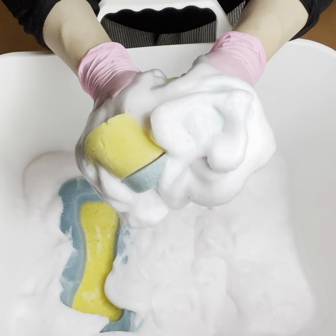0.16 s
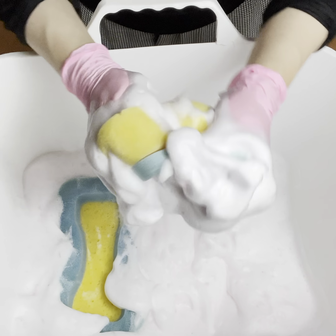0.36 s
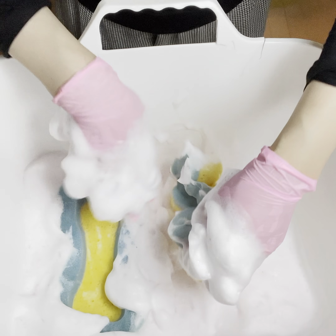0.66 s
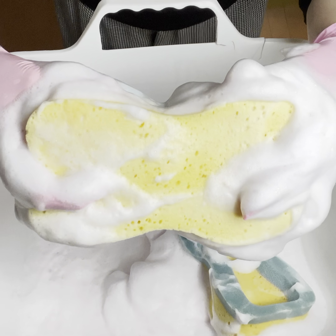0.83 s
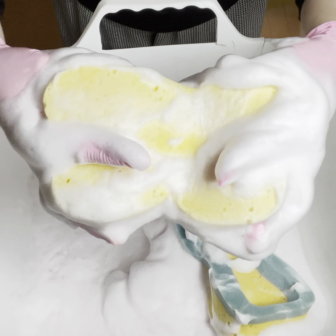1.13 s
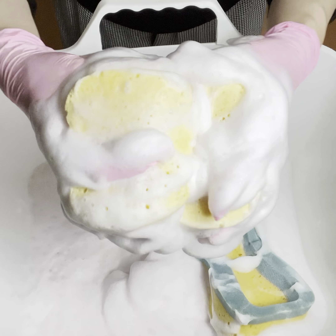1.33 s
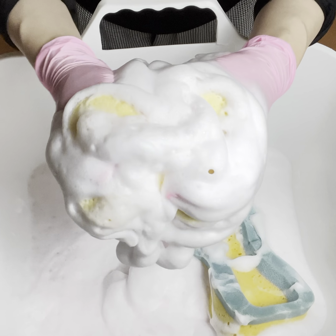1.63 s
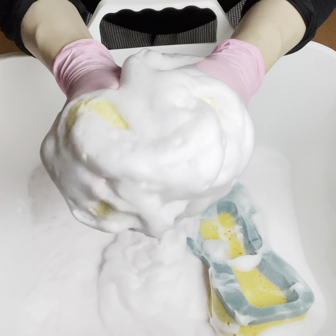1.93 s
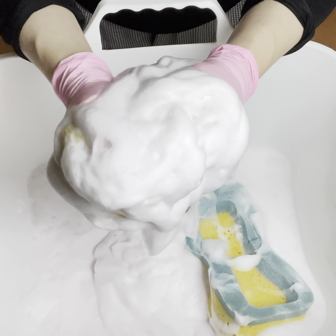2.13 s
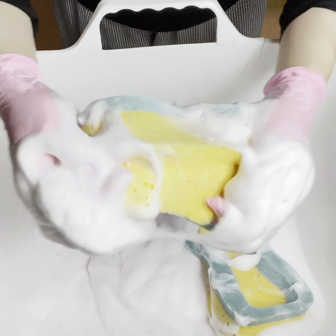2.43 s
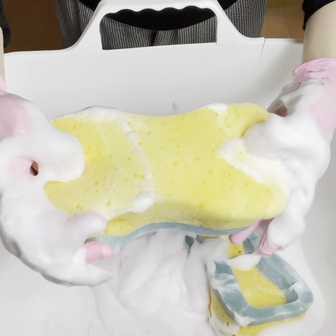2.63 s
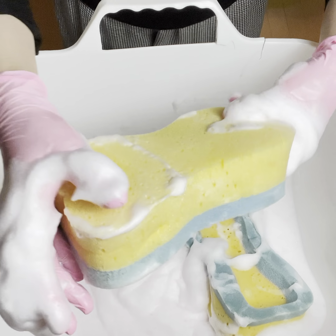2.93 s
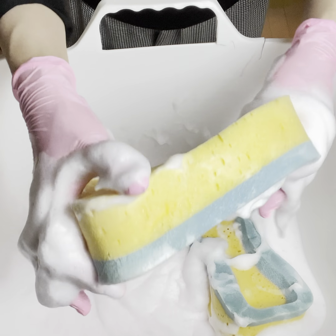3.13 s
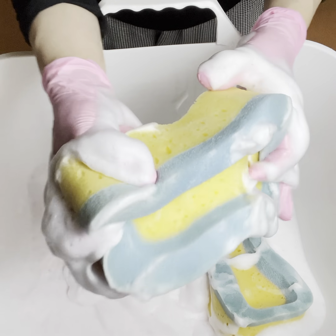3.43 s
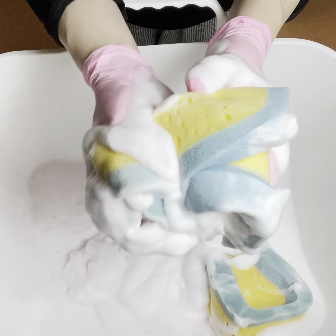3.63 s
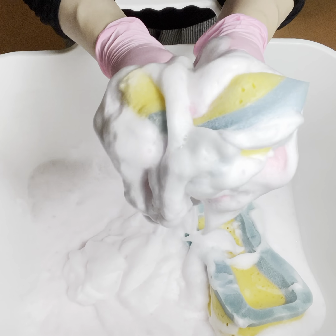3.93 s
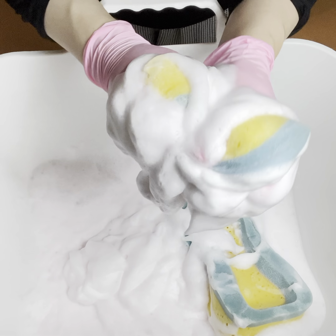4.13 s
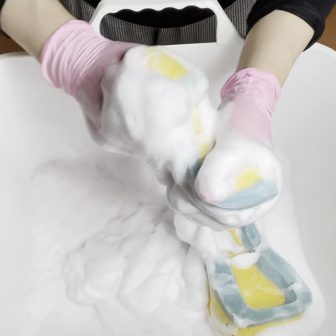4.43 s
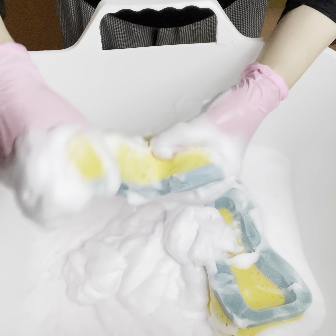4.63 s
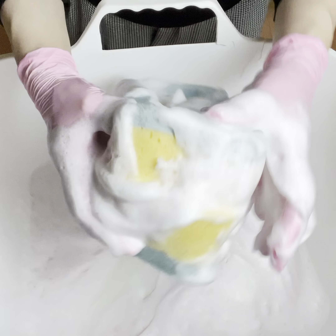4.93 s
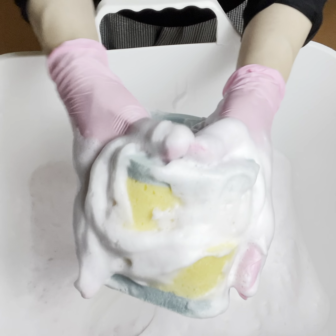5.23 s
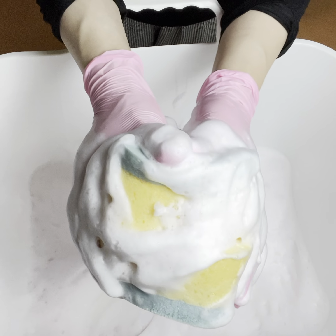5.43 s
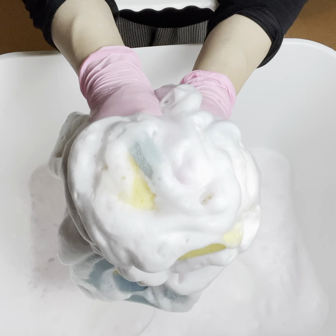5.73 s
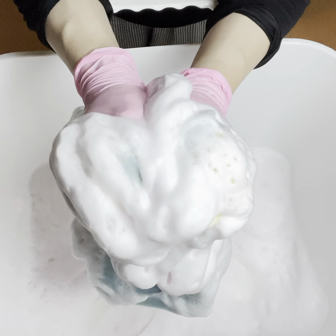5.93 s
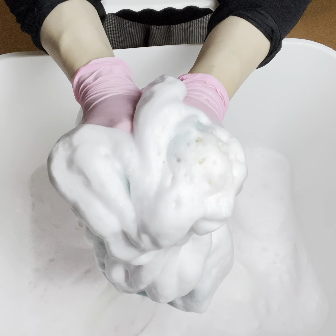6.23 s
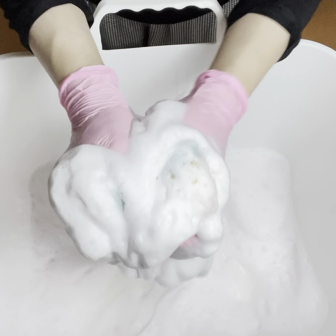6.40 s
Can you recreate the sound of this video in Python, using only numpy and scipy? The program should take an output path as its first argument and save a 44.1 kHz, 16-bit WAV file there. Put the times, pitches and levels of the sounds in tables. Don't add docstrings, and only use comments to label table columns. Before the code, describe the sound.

Gloved hands knead a soapy sponge in bursts of bubbly squishing and fine crackling fizz, with quieter lulls, then one loud slick snap.

```python
import sys
import numpy as np
from scipy import signal
from scipy.fft import rfft, irfft, next_fast_len
from scipy.io import wavfile
from scipy.ndimage import uniform_filter1d

SR = 44100
rng = np.random.default_rng(int(sys.argv[2]) if len(sys.argv) > 2 else 0)


def rack_gain(trim_db):
    fader = np.asarray(trim_db, float)
    return 10 ** (fader / 20)


def master_out(mix):
    frames = np.transpose(np.atleast_2d(mix))
    ceiling = np.clip(frames, -1, 1)
    pcm = np.round(ceiling * 32767).astype(np.int16)
    wavfile.write(sys.argv[1], SR, pcm)


N = 289296
T = np.arange(N) / SR

# [f/Hz, level/dB]
ROOM_TONE = [(21, -33), (35, 2), (152, 3), (321, -1.5), (541, -5.5), (676, -16.5), (1040, -4), (1530, -9),
             (2070, -14), (2580, -17), (3000, -55), (3900, -50), (6600, -120)]
# [f/Hz, level/dB]
RUMBLE_TONE = [(25, -25), (38, -5), (52, 10), (68, 14), (95, -26), (200, -52)]
# [t/s, change/dB, rise/s, fall/s]
KNOCKS = [
    (.15, 11, 0.28, 0.42),
    (1.17, 7, 0.27, .3),
    (1.7, -4, .2, .12),
    (2.3, -5, 0.36, .3),
    (2.67, 7, .1, .15),
    (3.05, 4, 0.14, 0.11),
    (3.85, 2, 0.22, .25),
    (4.84, 2, .1, 0.13),
    (5.5, 1, 0.33, 0.44),
]
MACHINE_HZ = [117.5, 145.1]
# [t/s], and its [level/dB]
LOW_MACHINE_S = (2.25, 2.38, 2.9, 3.05, 3.2)
LOW_MACHINE_DB = (-66, -42.5, -40, -41, -57)
# [t/s, change/dB, rise/s, fall/s]
HIGH_MACHINE_SWELLS = [
    (3.76, 12.5, 0.16, 0.16),
    (5.8, 4, 0.34, 0.33),
]
# [t/s, pressure/dB, narrowing of the pores/dB]
SQUEEZES = [(0, -32, -7), (.74, -46, -5), (.755, -49.5, -8), (1.22, -42.5, -10), (1.45, -35.5, -5.5),
            (1.8, -34, -6.5), (2.0, -37, -11), (2.62, -43, -1.5), (2.74, -52.5, 1), (3.42, -45.5, -2.5),
            (3.7, -33.5, -0.5), (4.08, -35.5, -4), (4.3, -42.5, -6), (4.95, -46, -6.5), (5.38, -44, -5.5),
            (5.55, -30, -7), (6.02, -33.5, -4), (6.28, -52.5, -5)]
# [t/s, change/dB, rise/s, fall/s]
KNEADS = [(.1, -6, 0.17, 0.094), (.2, 2, 0.028, .008), (.228, 6, 0.012, 0.0055), (.26, 2, .02, 0.07),
          (.775, -8, .02, .006), (2.055, -7, 0.035, .006), (2.083, -2, .012, .004), (4.04, 1.5, .06, 0.071),
          (4.11, -1, 0.018, .03), (5.428, -4, 0.026, .005), (.44, 3.5, 0.046, 0.059),
          (1.81, 7.5, 0.07, 0.029), (1.88, -2.5, 0.049, .04), (2.09, -0.5, 0.028, .05),
          (2.16, -3, 0.044, 0.034), (2.28, 3, 0.097, 0.11), (2.82, 5, 0.077, 0.022),
          (3.85, -3.5, 0.33, 0.064), (4.36, 6.5, 0.05, 0.017), (4.75, 3, 0.12, 0.065),
          (4.95, -11, 0.077, 0.033), (5.9, -1, 0.076, 0.053), (6.39, 17.5, 0.092, 0.15),
          (6.49, 13.5, 0.096, 0.14)]
# [f/Hz, level/dB]
GURGLE_TONE = [(250, -15.5), (420, -1), (600, -3), (800, -4), (1100, -0.5), (1400, 1), (2000, -8.5),
               (2800, -13.5), (4000, -32.5)]
# [t/s, f/Hz, lift/dB]
CAVITY = [(0, 715, 0), (.22, 1000, 1), (.7, 810, 2), (1.3, 1020, -2), (1.5, 640, 0.5), (1.8, 940, 0),
          (1.93, 570, 0.5), (2.3, 1000, 0), (2.7, 620, 1), (3.68, 635, -4), (3.88, 970, 0.5),
          (4.07, 860, 5), (4.57, 910, 0), (5.5, 610, -1), (5.7, 1150, -5), (5.82, 930, -10),
          (6.03, 566, -1.5), (6.45, 700, 3)]
# [t/s, change/dB, rise/s, fall/s]
RUBS = [
    (.73, 26, .45, .012),
    (2.27, 18, .03, .06),
    (2.6, -4, 0.22, .05),
    (3.63, -1, 0.033, .1),
    (3.86, 16, .1, .05),
    (4.07, 5, 0.067, .04),
    (5.65, -1, 0.13, 0.088),
    (5.83, 15, 0.075, .1),
]
# [f/Hz, level/dB]
SLOSH_TONE = [(50, -16), (100, -3.5), (150, -5.5), (200, -0.5), (320, -8.5), (500, -38)]
# [t/s, change/dB, rise/s, fall/s]
SLOPS = [(.6, 6, .3, 0.43), (.82, -16, 0.054, 0.079), (1.35, 0, .2, 0.22), (1.9, -16, 0.056, 0.23),
         (2.45, -7, 0.13, 0.041), (2.86, -14, 0.11, 0.12), (3.72, 0.5, 0.14, 0.095),
         (4.4, -4.5, 0.12, 0.093), (5.3, 3.5, 0.17, 0.53), (4.94, -23, 0.038, 0.05),
         (5.83, 6.5, 0.12, 0.12), (6.4, 17, 0.073, 0.3)]
# [t/s, fizz/dB, brightness/dB re fizz, coarse bubbles/dB re fizz]
FIZZ = [(0, -40, -10, -5.5), (.22, -51.5, -13, 7), (.5, -43, -12.5, 2), (.76, -53.5, -6.5, 4),
        (.95, -56, -17, -7), (1.45, -33.5, -8.5, -0.5), (1.7, -43, -18, -1.5), (2.2, -52, -4.5, 4),
        (2.5, -42.5, -11.5, -1.5), (3.08, -57, -14, -3), (3.5, -42, -12, -1), (4, -41, -10, 1.5),
        (4.2, -45, -7.5, -2), (4.85, -46.5, -9.5, -0.5), (5.15, -62, -7, 2), (5.6, -37, -12, -0.5),
        (5.9, -45.5, -12.5, 1), (6.33, -64.5, -9, 1)]
# [t/s, change/dB, rise/s, fall/s]
GUSHES = [(.28, 4.5, 0.015, 0.034), (.84, -18, 0.045, 0.063), (1.19, -5, 0.054, 0.1), (.7, 4, 0.13, .04),
          (1.81, 1.5, 0.11, 0.036), (1.9, -3.5, 0.13, .04), (1.99, 0, 0.032, 0.042),
          (2.06, -6.5, 0.062, 0.022), (2.23, -10.5, 0.083, 0.038), (2.27, 13, 0.022, 0.026),
          (2.36, 4, 0.068, 0.15), (2.48, 5, 0.0069, 0.079), (2.63, 6.5, 0.1, 0.029),
          (2.73, -2.5, 0.095, 0.055), (2.81, 5.5, 0.041, 0.043), (2.92, -5, 0.076, 0.066),
          (3.33, -5, .07, .06), (3.62, -3, 0.068, 0.034), (4.12, 2.5, 0.0091, 0.15),
          (4.38, 1.5, 0.04, 0.038), (4.52, -3, 0.16, 0.047), (4.58, 8.5, 0.018, 0.036),
          (4.67, 6, 0.055, 0.046), (4.97, -3, 0.025, 0.058), (5.15, 11.5, 0.045, 0.063),
          (5.8, 5, 0.11, 0.1), (6.03, 4, 0.092, 0.088), (6.2, 2.5, .03, 0.18), (6.424, 23.5, 0.091, .5),
          (6.5, -1, 0.056, .5)]
# [f/Hz, level/dB]
FIZZ_TONE = [(700, -3.5), (1500, 0), (2200, 3.5), (3000, 0.5), (4500, -0.5), (7000, -2.5), (8500, -1.5),
             (10500, -8), (12500, -8.5), (15500, -9)]
# [f/Hz, width/Hz, level/dB re direct sound]
TUB_MODES = [(548, 40, -4), (604, 32, -1), (740, 34, -1), (820, 45, -4), (970, 50, -4), (1060, 70, -5),
             (1326, 50, -1), (2000, 50, -2), (2620, 100, -4), (3790, 70, -3), (4117, 60, -6),
             (4705, 60, -7), (5450, 80, -7), (6154, 70, -5)]
# [t/s, peak/dB, f/Hz, length/s]
POCKETS = [(0.2033, -9, 1040, 0.0045), (0.236, -13.5, 1030, 0.0036), (0.253, -20, 1090, 0.006),
           (0.409, -18, 780, 0.0038), (0.473, -38, 1030, 0.0099), (0.778, -30, 740, 0.0061),
           (0.805, -29, 1050, 0.0024), (1.749, -20.5, 750, 0.0059), (1.786, -19, 1070, 0.0047),
           (1.796, -29, 980, 0.015), (1.919, -22.5, 288, 0.0093), (1.939, -28.5, 660, 0.026),
           (1.978, -36, 540, 0.0088), (2.06, -23.5, 523, 0.013), (2.084, -20.5, 1120, 0.01),
           (2.28, -27, 550, 0.012), (3.678, -21, 570, 0.007), (3.711, -18, 1250, 0.0032),
           (3.885, -21.5, 1040, 0.0071), (3.973, -24, 776, 0.005), (4.132, -25, 830, 0.0067),
           (4.34, -27.5, 590, 0.0026), (4.565, -22, 860, 0.0054), (4.572, -14.5, 867, 0.0031),
           (4.579, -17.5, 690, 0.0048), (5.433, -28, 730, 0.0058), (5.486, -21.5, 606, 0.0039),
           (5.552, -17, 700, 0.0072), (5.798, -15, 880, 0.0034), (6.024, -18.5, 536, 0.0072),
           (0.23, -16.5, 1900, 0.0029), (0.18, -26, 2820, .0015), (2.108, -28, 1050, 0.015),
         (1.797, -22.5, 596, 0.013), (3.776, -24, 200, 0.0091), (3.747, -23, 190, .01),
         (3.7, -11, 1000, 0.0042), (.205, -15, 540, 0.0034), (.235, -19, 560, 0.0034),
         (2.06, -22, 1240, 0.0072), (2.089, -25.5, 520, 0.015), (2.641, -34, 336, 0.033),
         (3.642, -24, 160, 0.024), (4.81, -27, 209, 0.014), (5.557, -18, 220, .008),
         (.074, -30, 760, 0.0059), (5.566, -20, 630, 0.01), (3.737, -25, 760, 0.0078),
           (0.18, -21, 1060, 0.004), (0.265, -31, 980, 0.0036), (1.595, -21.5, 810, 0.0034),
            (1.66, -26, 533, 0.0045), (1.694, -26, 790, 0.004), (1.776, -23, 982, 0.0031),
            (3.604, -24, 810, 0.0047), (3.664, -22.5, 533, 0.0043), (3.714, -19, 1070, 0.0032),
            (3.748, -27, 697, 0.0033), (3.768, -29, 732, 0.0046), (3.791, -15, 1350, 0.0048),
            (3.81, -27, 589, 0.004), (3.898, -19, 1070, 0.0036), (4.004, -21, 775, 0.004),
            (4.03, -20, 1000, 0.0033), (4.059, -23, 890, 0.0057), (4.082, -25, 958, 0.0047),
            (5.579, -20, 820, 0.0036), (5.711, -20, 1360, 0.004), (5.73, -28, 619, 0.0031),
            (5.757, -23, 603, 0.0053), (5.913, -21, 821, 0.005), (5.925, -23, 571, 0.004),
            (5.942, -19.5, 600, 0.004), (5.98, -18, 746, 0.0021), (6.01, -24, 560, 0.0031),
            (6.042, -23, 587, 0.0036)]
# [t/s, peak/dB, t60/s]
SPITS = [(0.2019, -43, 0.02), (0.2723, -32, 0.022), (0.8703, -35, 0.0089), (0.9113, -34, 0.018),
         (0.9208, -35, 0.018), (1.062, -46, 0.018), (1.3428, -35, 0.016), (1.916, -27, 0.02),
         (1.9794, -33, 0.018), (2.0784, -29, 0.028), (2.2597, -26, 0.031), (2.4818, -28, 0.023),
         (4.575, -35, 0.02), (5.1365, -35, 0.037), (6.0856, -41, 0.018), (6.1883, -35, 0.018),
         (6.347, -51, 0.02), (6.37, -26, 0.025), (6.386, -32, 0.023), (6.4467, -10, 0.0078),
         (6.4757, -22, 0.022),
         (0.0842, -24.5, 0.015), (0.3172, -32, 0.018), (0.4025, -33, 0.015), (0.4264, -37, 0.015),
         (0.9577, -34, 0.015), (0.9777, -42, 0.017), (1.0844, -33, 0.015), (1.9979, -31, 0.015),
         (2.1674, -37, 0.015), (2.3221, -32, 0.015), (2.9856, -44, 0.015), (4.4737, -28, 0.02),
         (4.995, -42, 0.015), (5.2435, -43, 0.015), (5.453, -38, 0.015)]
# [t/s, peak/dB, f/Hz, length/s]
THUMPS = [
    (4.815, -27, 57.5, 0.054),
]
# [t/s, peak/dB, f/Hz, spray/dB re peak, length/s]
SMACK = [(6.372, -23, 437, -8, 0.0059), (6.377, -21, 260, -20, 0.0072), (6.388, -14.5, 515, -15, 0.013),
         (6.4, -17, 765, -14, 0.0056), (6.407, -14, 690, -16, 0.004), (6.386, -27, 3280, -8, .003),
         (6.4, -22, 2260, -0.5, 0.007), (6.433, -22, 2050, -21, 0.0043), (6.44, -14.5, 2050, -21, 0.0033),
         (6.424, -17, 630, -30, 0.0038), (6.436, -24, 750, -22, 0.0099), (6.441, -15, 850, -29, 0.0058),
         (6.4472, -7, 1310, -10, 0.0043), (6.4475, -4, 736, -24, 0.011), (6.449, -11, 962, -17, 0.009),
         (6.4517, -11.5, 2030, -2.5, 0.0038), (6.449, -22, 2790, 12, 0.0073),
         (6.4515, -9, 600, -25.5, 0.012), (6.455, -9.5, 422, -34, 0.0091), (6.4605, -11, 730, -31, 0.0046),
         (6.47, -22, 745, -15, 0.0045), (6.474, -31.5, 907, 9, 0.03)]
# [f/Hz, likeness 0-1, right leads/rad, left minus right/dB]
STEREO = [(60, .997, 0, 0), (200, .99, 0, -.3), (330, .9, 0, -2), (600, .88, -.3, -6), (950, .8, -1.2, -7),
          (1550, .75, -2.7, -2.5), (1800, .15, -2.0, -2.5), (2100, .45, -1.3, -2), (2450, .5, -2.9, -.6),
          (2900, .2, -4.6, -1.5), (3800, .75, -6.2, 0), (5200, .76, -5.3, 0), (7300, .75, -4.2, .1),
          (8200, .99, -np.pi, 0), (10400, .99, -np.pi, 0), (11100, .55, -1.9, 0), (12400, .75, -.8, 0),
          (13100, .995, 0, 0)]


def evened(x):
    return x / np.sqrt(np.mean(x ** 2) + 1e-20)


def curves(rows):
    s, *columns = np.transpose(rows)
    return [np.interp(T, s, c) for c in columns]


def swells(rows):
    return sum(np.interp(T, [s - abs(rise), s, s + abs(fall)], [0, db, 0]) for s, db, rise, fall in rows)


def read(points, hz):
    f, *columns = np.transpose(points)
    return [np.interp(np.log(hz + 1), np.log(f + 1), c) for c in columns]


def colour(x, points):
    size = next_fast_len(N)
    level_db, = read(points, np.fft.rfftfreq(size, 1 / SR))
    return evened(irfft(rfft(x, size) * rack_gain(level_db), size)[:N])


def drift(seconds):
    size = int(seconds * SR)
    return evened(uniform_filter1d(uniform_filter1d(rng.standard_normal(N), size), size))


def add(mix, s, sound):
    part = mix[round(s * SR):][:len(sound)]
    part += sound[:len(part)]


def passed(x, order, hz, kind, both_ways=True):
    run = signal.sosfiltfilt if both_ways else signal.sosfilt
    return run(signal.butter(order, hz, kind, fs=SR, output="sos"), x)


def resonate(x, hz, width):
    turn = np.exp(2j * np.pi * np.cumsum(hz) / SR)
    r = np.exp(-np.pi * width / SR)
    return 2 * (turn * signal.lfilter([1 - r], [1, -r], x / turn)).real


def machines():
    low_db = np.interp(T, LOW_MACHINE_S, LOW_MACHINE_DB)
    high_db = -46.5 + swells(HIGH_MACHINE_SWELLS)
    out = np.zeros(N)
    for hz, db in zip(MACHINE_HZ, (low_db, high_db)):
        level = rack_gain(db + drift(.15))
        out += level * np.sin(2 * np.pi * np.cumsum(hz + .6 * drift(.3)) / SR)
    return out


def room():
    air = rack_gain(-44) * colour(rng.standard_normal(N), ROOM_TONE)
    rumble = rack_gain(-53.5 + swells(KNOCKS)) * colour(rng.standard_normal(N), RUMBLE_TONE)
    return air + rumble + machines()


def bubbles(lo_hz, hi_hz, per_s, cycles, spread_db, glide, count=14):
    out = np.zeros(N)
    for hz in np.geomspace(lo_hz, hi_hz, count):
        u = np.arange(int(4 * SR * 6 / hz)) * hz / SR
        ring = u * np.exp(-u * 3 / cycles) * np.sin(2 * np.pi * u * (1 + glide * u / cycles))
        chance, size, sign = rng.random((3, N), dtype=np.float32)
        struck = chance < per_s / count / SR
        hits = struck * rack_gain(-spread_db * np.log(size + 0.015)) * np.sign(sign - .5)
        out += signal.oaconvolve(hits, ring / np.linalg.norm(ring) * np.sqrt(hz))[:N]
    return evened(out)


def gurgle(throb):
    hand_db, narrowing_db = curves(SQUEEZES)
    wide_db = hand_db + swells(KNEADS)
    narrow_db = wide_db + narrowing_db
    rings = bubbles(303.4, 3310, per_s=3000, cycles=4.68, spread_db=2.0, glide=-0.069)
    flow = 0.99 * rng.standard_normal(N) + rings
    air = colour(flow, GURGLE_TONE) * rack_gain(1.15 * throb - 2.5)
    cavity_hz, lift_db = curves(CAVITY)
    air = air + rack_gain(lift_db) * resonate(air, cavity_hz, width=270)
    air = air + rack_gain(-12 + swells(RUBS)) * resonate(air, np.full(N, 2050), width=520)
    narrow = passed(air, 2, 900, "high")
    return (air - narrow) * rack_gain(wide_db + 1.5) + narrow * rack_gain(narrow_db + 4.0)


def slosh(throb):
    hand_db, _ = curves(SQUEEZES)
    slosh_db = -43 + 0.54 * (hand_db + 38) + swells(SLOPS)
    return colour(rng.standard_normal(N), SLOSH_TONE) * rack_gain(slosh_db + 0.5 + 2.3 * throb)


def fizz(throb):
    fizz_db, bright_db, coarse_db = curves(FIZZ)
    gush_db = swells(GUSHES)
    fizz_db = fizz_db + gush_db
    bright_db = bright_db - 0.53 * np.maximum(gush_db, 0)
    popped = rng.random(N) < 2500 / SR
    pops = popped * rack_gain(3.3 * rng.exponential(1, N).clip(0, 4)) * rng.standard_normal(N)
    hiss = colour(0.82 * rng.standard_normal(N) + 0.47 * evened(pops), FIZZ_TONE)
    top = passed(hiss, 1, 8000, "high")
    coarse = passed(hiss, 2, 2900, "low")
    mixed = hiss + top * (rack_gain(bright_db + 9.0) - 1) + coarse * (rack_gain(coarse_db) - 1)
    return mixed * rack_gain(fizz_db + 5.5 + 1.05 * throb)


def tub(x):
    size = next_fast_len(N)
    f = np.fft.rfftfreq(size, 1 / SR)
    modes = sum(rack_gain(db) / (1 + 2j * (f - hz) / width) for hz, width, db in TUB_MODES)
    return irfft(rfft(x, size) * (1 + modes), size)[:N]


def burst(db, hz, spray_db, length):
    t = np.arange(3000) / SR
    jolt, spray = rng.standard_normal((2, 3000))
    wobble = 0.51 * uniform_filter1d(jolt, 50)
    pitch = hz * (1 + 0.33 * np.exp(-t / 0.001) - 0.052 * t / length + wobble)
    rise = 1 - np.exp(-t / .0003)
    fade = np.exp(-(t / length) ** 3) + 0.035 * np.exp(-t / (3 * length))
    ring = rise * fade * np.sin(2 * np.pi * np.cumsum(pitch.clip(50)) / SR)
    snap = .75 * np.exp(-t / .0005) * np.sin(2 * np.pi * min(2.6 * hz, 3000) * t)
    spray = passed(spray, 2, [2000, 7500], "band", both_ways=False)
    spray = rack_gain(spray_db + 8.5) * np.exp(-t / (0.54 * length)) * spray
    return rack_gain(db - 4.5) * (ring + snap + spray)


def pockets():
    out = np.zeros(N)
    for s, db, hz, length in POCKETS:
        add(out, s, burst(db, hz, min(-50 - db, -12), length))
    return out


def spits():
    t = np.arange(1500) / SR
    out = np.zeros(N)
    for s, db, t60 in SPITS:
        add(out, s, rack_gain(db - 60 * t / t60) * rng.standard_normal(1500))
    return rack_gain(-0.5) * passed(out, 1, [2500, 7600], "band", both_ways=False)


def thump():
    out = np.zeros(N)
    for s, db, hz, length in THUMPS:
        t = np.arange(0, length, 1 / SR)
        add(out, s, -rack_gain(db) * signal.windows.tukey(len(t), .6) * np.sin(2 * np.pi * hz * t))
    return out


def smack():
    out = np.zeros(N)
    for s, *pocket in SMACK:
        add(out, s, burst(*pocket))
    return out


def scene():
    pore_throb, foam_throb = drift(0.034), drift(0.016)
    ringing = 0.58
    fields = []
    for share in (1, rack_gain(-3.5)):
        bursts = share * (pockets() + thump() + smack())
        steady = gurgle(pore_throb) + slosh(pore_throb) + fizz(foam_throb) + spits()
        fields.append(tub(steady + ringing * bursts) + (1 - ringing) * bursts + room())
    return np.array(fields)


def roll_off(x):
    return signal.sosfilt(signal.butter(12, 16970, fs=SR, output="sos"), x)


def record(dry):
    size = next_fast_len(N)
    hz = np.fft.rfftfreq(size, 1 / SR)
    same, lead, tilt_db = read(STEREO, hz)
    weights = np.sqrt([(1 + same) / 2, (1 - same) / 2])
    shared, apart = rfft(dry, size) * (hz < 15830) * weights
    turn = np.exp(.5j * lead) * rack_gain(-tilt_db / 2)
    ports = irfft([(shared + apart) / turn, (shared - apart) * turn], size)[:, :N]
    mix = np.clip(ports, -1, 1)
    return roll_off(mix)


dry = scene()
out = record(dry)
master_out(out)
```